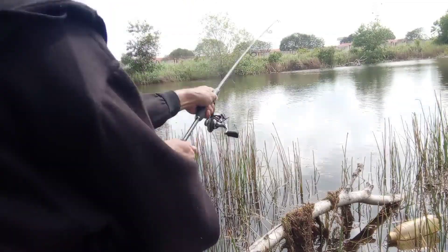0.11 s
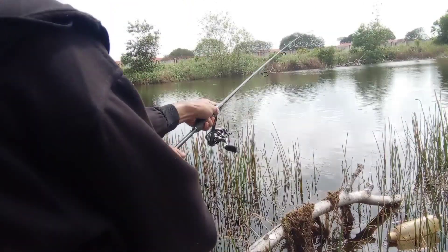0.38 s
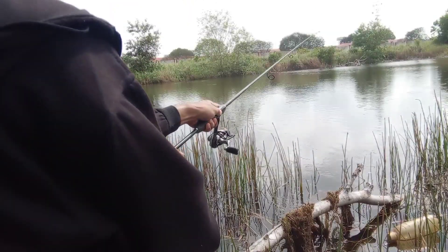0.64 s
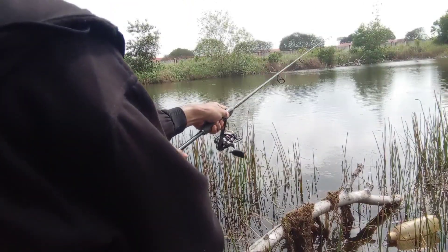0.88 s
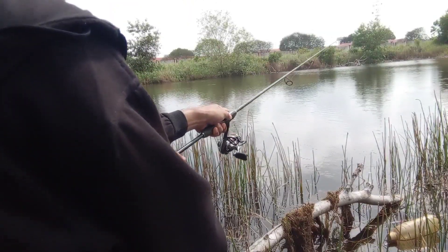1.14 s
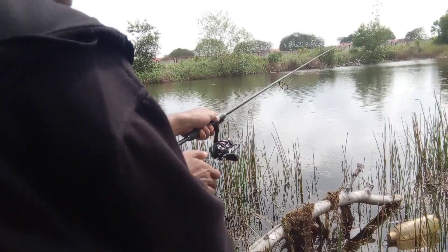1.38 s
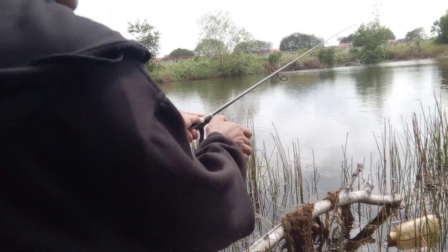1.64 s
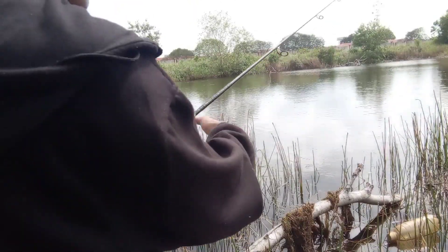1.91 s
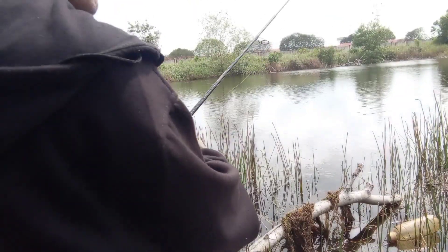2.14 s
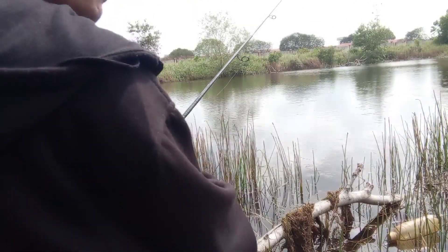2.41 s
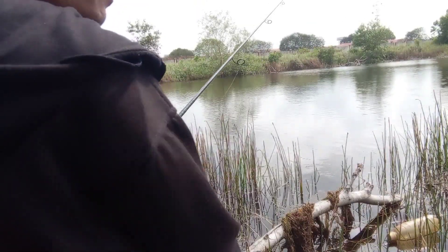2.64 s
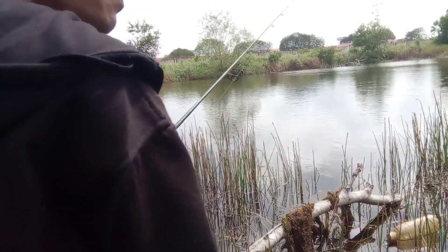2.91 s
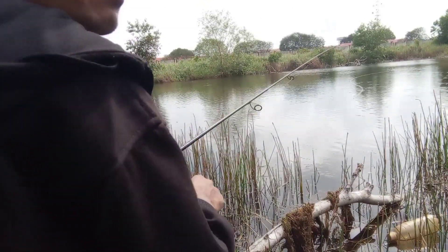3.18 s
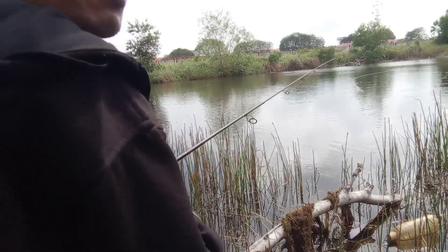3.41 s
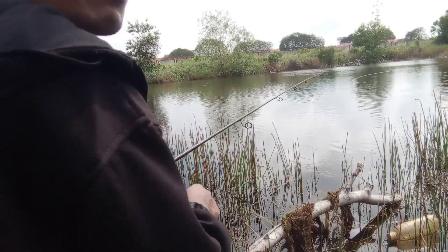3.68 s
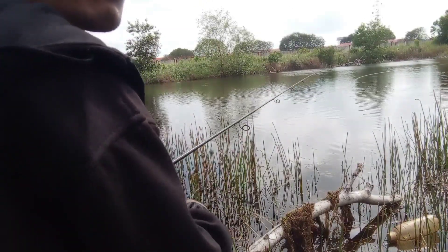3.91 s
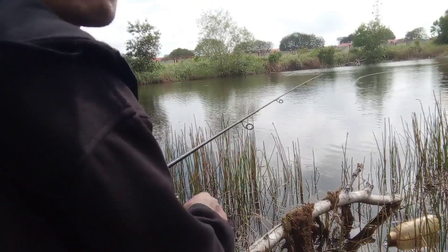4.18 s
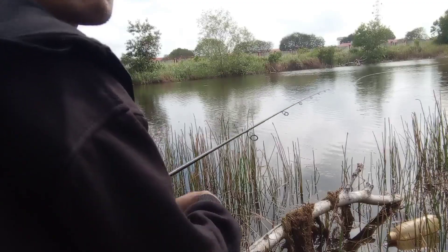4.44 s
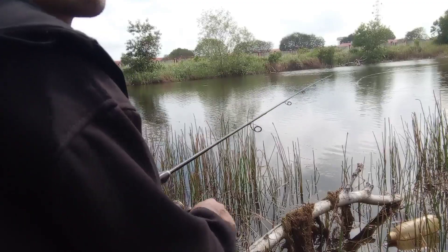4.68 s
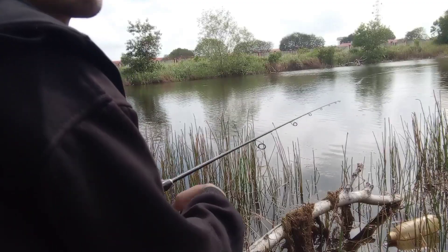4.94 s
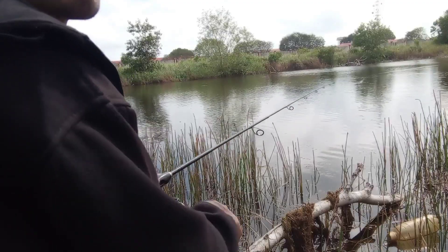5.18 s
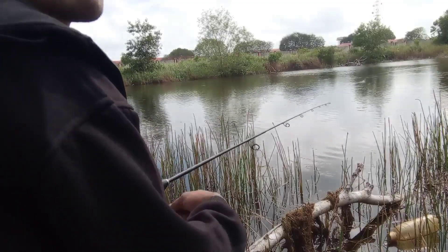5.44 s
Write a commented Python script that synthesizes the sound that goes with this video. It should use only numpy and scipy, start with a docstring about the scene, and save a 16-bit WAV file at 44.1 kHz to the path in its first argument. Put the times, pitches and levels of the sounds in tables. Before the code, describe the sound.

Quick cast with whoosh and sizzling line, followed by scattered sharp bird calls, small tackle clicks and a faint wavering reel whine outdoors.

```python
"""Casting over a reedy pond

An angler casts: noise bands form the rod's swish and the hiss of line off the spool; the rod tip whistles.
Noise cracks strike the reel's resonances as clicks, and a roughened sine is its whine.
A water bird in the reeds gives short rasping chucks: fluttered partials with noise in throat resonances.
Gliding sines are hollow notes and far small birds; a thin tone and a sleeve brush come over air and rumble.
"""
import sys
import numpy as np
from scipy import signal
from scipy.fft import rfft, irfft, next_fast_len
from scipy.io import wavfile
from scipy.ndimage import uniform_filter1d

SR = 44100
rng = np.random.default_rng(int(sys.argv[2]) if len(sys.argv) > 2 else 0)


def digitize_waveform(pressure):
    """Quantize a signal to 16-bit integers and store it at the path in sys.argv[1].

    Rows of a 2-D input are taken as channels; values are limited to [-1, 1].
    """
    field = np.atleast_2d(pressure).T
    bounded = np.clip(field, -1, 1)
    quanta = np.round(bounded * 32767).astype(np.int16)
    wavfile.write(sys.argv[1], SR, quanta)


def attenuation_scalar(level_db):
    """Turn a level in dB into a linear amplitude multiplier (20 dB per decade)."""
    decades = np.asarray(level_db, float) / 20
    return 10 ** decades


N = 245637
T = np.arange(N) / SR   # seconds

# Steady air noise: spectrum. Each row: frequency in Hz, relative density in dB per Hz.
AIR_SPECTRUM = [(100, 2), (308, -15), (550, -18.5), (1290, -24), (4840, -27), (6180, -25.5), (7600, -34.5),
                (9250, -38), (11700, -49.5), (13600, -44.5), (16000, -42.5)]
# Low outdoor rumble: course. Each row: time in seconds, level in dB.
RUMBLE_LEVEL = [(0, -66), (.55, -61), (.9, -67), (1.7, -63), (2.6, -65), (3.45, -61.5), (3.8, -65),
                (4.6, -66), (5.57, -65.5)]
# Rumble spectrum. Each row: frequency in Hz, relative density in dB per Hz.
RUMBLE_SPECTRUM = [(25, -20), (45, -17), (75, -6), (97, 0.5), (130, -3), (177, -5.5), (300, -18),
                   (390, -38.5)]
# Line running out: course. Each row: time in seconds, hiss level in dB.
LINE_LEVEL = [(.03, -66), (.04, -63), (.066, -51), (.102, -37.5), (.138, -38.5), (.186, -49), (.266, -49),
              (.434, -58), (.7, -67), (1.1, -79.5)]
# Line hiss spectrum. Each row: frequency in Hz, relative density in dB per Hz.
HISS_SPECTRUM = [(2240, -36.5), (3800, -26.5), (5810, 1), (7220, 2.5), (7830, -4.5), (9050, -1),
                 (10500, -21.5), (13600, -41.5), (22000, -120)]
# Top of the line hiss: spectrum. Each row: frequency in Hz, relative density in dB per Hz.
TOP_HISS_SPECTRUM = [(9500, -6.5), (11300, -12.5), (13400, -10.5), (16000, -7)]
# Singing of the line: times in seconds at which it comes in, is full, is still full, is gone.
SINGING_TIMES = (.07, .14, .74, .9)
# Swing of the rod: course. Each row: time in seconds, whoosh level in dB, air rush level in dB.
CAST_LEVELS = [(.032, -71, -63), (.066, -39, -48.5), (.102, -47, -30.5), (.138, -44, -34),
               (.186, -69, -51.5), (.224, -68, -49.5), (.266, -53.5, -45.5), (.33, -70, -53),
               (.44, -71, -64)]
# Rod whoosh spectrum. Each row: frequency in Hz, relative density in dB per Hz.
WHOOSH_SPECTRUM = [(130, -60), (220, -39), (298, -4.5), (350, -3.5), (646, -0.5), (1100, -11), (1430, -33),
                   (2420, -120)]
# Air rush spectrum. Each row: frequency in Hz, relative density in dB per Hz.
RUSH_SPECTRUM = [(530, -27), (900, -7), (1170, -5.5), (1380, -2), (1830, -4.5), (2360, -2.5), (4500, -4.5),
                 (5850, -10), (9900, -120)]
# Whistles of the speeding rod tip. Each row: start in seconds, length in seconds, first pitch in Hz,
# last pitch in Hz, greatest level in dB.
ROD_WHISTLES = [(.09, .05, 1398, 2080, -39), (.092, .04, 2750, 4340, -42)]
# Hollow swoops, knocks and hoots. Each row: start in seconds, length in seconds, first pitch in Hz,
# last pitch in Hz, greatest level in dB.
HOLLOW_NOTES = [(.048, 0.037, 419.6, 744, -46.5), (.451, 0.017, 1057, 1102, -44.5),
                (1.778, 0.028, 952, 1040, -58), (1.964, 0.0191, 760, 685, -43),
                (1.988, 0.03, 645, 506, -61), (2.675, 0.12, 785, 813, -57)]
# Clicks of reel and tackle. Each row: start in seconds, strength in dB, nominal pitch of the crack in Hz.
CLICKS = [(0.24, -35, 6070), (1.6348, -56, 6840), (1.909, -51.5, 6140), (1.9157, -50.5, 5960),
          (1.9654, -48, 3640), (1.977, -40, 5160), (2.0658, -53.5, 3950), (2.09, -60, 3700),
          (2.4718, -32, 5300), (2.692, -51.5, 2200), (3.3921, -60, 3300), (4.264, -52.5, 4000),
          (4.282, -54.5, 1990), (4.404, -60.5, 4788), (4.733, -50.5, 3510), (5.1524, -59, 6020),
          (5.1993, -49.5, 3670)]
# Resonances of the reel. Each row: frequency in Hz, relative strength in dB, time to fall 60 dB in seconds.
REEL_MODES = [(1260, -25, .015), (1890, -3, 0.02), (2320, -9, .012), (3450, -3, .012), (4250, 7.5, 0.015),
              (5260, 1.5, 0.018), (5950, -8, 0.014)]
# Short far chirps. Each row: start in seconds, length in seconds, first pitch in Hz, last pitch in Hz,
# greatest level in dB.
CHIRPS = [(.3, 0.046, 3720, 4400, -58), (.37, 0.036, 4600, 4550, -54.5), (1.745, 0.07, 5600, 5600, -67.5),
          (2.06, 0.047, 3870, 4020, -69), (2.52, 0.072, 3500, 3900, -80), (4.075, 0.049, 5600, 5600, -68),
          (4.45, 0.096, 3060, 2969, -73.5), (5.2, 0.0434, 3700, 3710, -70.5),
          (5.4, 0.093, 5900, 5620, -66.5), (5.52, 0.07, 3750, 3970, -70)]
# Far rising whistles. Each row: start in seconds, length in seconds, first pitch in Hz, last pitch in Hz,
# greatest level in dB.
WHISTLES = [(1.485, 0.12, 3350, 4840, -57), (2.615, 0.12, 3450, 4580, -58), (4.15, .12, 3400, 4760, -60)]
# Chucks of the water bird, each turning on a crest of pitch. Each row: crest time in seconds, lead-in in
# seconds, tail in seconds, crest pitch in Hz, dip pitch in Hz, closing pitch in Hz, level in dB, change over
# the tail in dB, half lines relative to the voice in dB, octave relative to the voice in dB.
CHUCKS = [(0.489, 0.033, 0.032, 1930, 1331, 1430, -28.5, -4.5, -3.5, -10.5),
          (.750, 0.027, 0.034, 1923, 1450, 1600, -27, -1, -6, -12.5),
          (1.172, 0.03, 0.03, 1969, 1409, 1600, -31, -3, -2, -7),
          (1.297, 0.03, 0.034, 1787, 1199, 1300, -31.5, -11.5, -7, -6.5),
          (1.581, 0.028, 0.04, 1826, 1225, 1350, -34, -8, -2.5, -12.5),
          (2.39, .026, 0.0415, 1670, 1064, 1320, -35.5, -3, -4, -5),
          (2.509, 0.0239, 0.041, 1605, 1075, 1300, -44, -8, 5, -6.5),
          (3.349, .029, .032, 1994, 1442, 1540, -32, -6.5, 0.5, -9.5),
          (4.559, 0.028, 0.027, 1925, 1450, 1500, -32.5, -4, 0, -10),
          (4.772, 0.031, 0.026, 1917, 1504, 1520, -34, -3.5, 0, -7),
          (5.494, .027, 0.035, 1689, 1214, 1330, -34, -4.5, -14, -6)]
# Throat resonances. Each row: centre in Hz, width in Hz, level relative to the voice in dB with the beak open.
THROAT_MODES = [(2880, 220, -25), (3630, 210, -35.5), (4260, 96, -41), (4680, 380, -44), (5380, 170, -41.5),
                (5820, 500, -31.5), (6800, 310, -34.5), (7290, 1100, -35.5), (9130, 400, -46)]
# How freely each pitch leaves throat and beak. Each row: frequency in Hz, gain in dB.
PASSAGE = [(1000, -21), (1250, -3.5), (1550, 1), (1790, -4), (2050, 2.5), (2500, -6.5), (2900, -8),
           (3300, -21), (3700, -15), (4300, -16.5), (5200, -15), (6500, -26)]
# Spells of the thin far tone, one list for each. Each row: time in seconds, level in dB.
FAR_TONE_SPELLS = [
    [(.5, -83.5), (1.8, -83)],
    [(2.85, -87.5), (3.3, -89)],
    [(3.42, -87), (4.0, -80)],
]
# Sleeve brush spectrum. Each row: frequency in Hz, relative density in dB per Hz.
CLOTH_SPECTRUM = [(900, -7), (2000, -7), (3500, -10.5), (5500, 0), (7500, -12), (9000, -27), (12000, -32),
                  (15500, -25.5)]
# Whine of the turning reel: course. Each row: time in seconds, pitch in Hz, level in dB.
WHINE_COURSE = [(3.15, 1890, -82), (3.3, 1775, -75), (3.47, 1822, -64), (3.57, 1950, -88),
                (3.68, 1715, -77), (3.74, 1740, -72), (3.88, 1802, -74.5), (4.0, 1965, -68.5),
                (4.1, 1760, -74.5), (4.18, 1722, -83), (4.3, 1955, -68.5), (4.39, 1910, -86),
                (4.46, 1884, -71.5), (4.56, 1837, -78), (4.9, 1875, -92), (4.97, 1850, -68),
                (5.14, 1784, -82), (5.22, 1757, -67.5), (5.3, 1774, -65), (5.335, 1808, -85),
                (5.39, 1860, -67.5), (5.47, 1910, -70)]


def rms_one(x):
    """Normalisation: a signal divided by its root mean square has rms 1."""
    return x / np.sqrt(np.mean(x ** 2) + 1e-20)


def in_time(rows):
    """Piecewise linear interpolation: each column as a curve, then a gate open from first row to last."""
    s, *columns = np.transpose(rows)
    curves = [np.interp(T, s, column) for column in columns]
    gate = np.interp(T, [s[0] - 0.004, s[0], s[-1], s[-1] + 0.005], [0, 1, 1, 0])
    return curves + [gate]


def joined(tables):
    """Superposition of gates: several short courses become one set of curves with a common gate."""
    all_rows = sum(map(list, tables), [])
    gate = np.minimum(sum(in_time(table)[-1] for table in tables), 1)
    return in_time(all_rows)[:-1] + [gate]


def drift(rate_hz):
    """Low-pass filtering: two equal poles turn white noise into slow wandering of rms 1."""
    r = np.exp(-2 * np.pi * rate_hz / SR)
    noise = rng.standard_normal(N + SR)
    return rms_one(signal.lfilter([1], [1, -2 * r, r * r], noise)[SR:])   # the first second settles the filter


def coloured(spectrum):
    """Spectral shaping: white noise weighted in frequency, its rms brought to 1."""
    hz, db = np.transpose(spectrum)
    size = next_fast_len(N)
    log_hz = np.log(np.arange(size // 2 + 1) * SR / size + 1)
    shape = attenuation_scalar(np.interp(log_hz, np.log(hz), db, left=-90, right=-90))
    return rms_one(irfft(rfft(rng.standard_normal(size)) * shape, size)[:N])


def ring(x, hz, t60):
    """Damped resonance: a unit impulse excites a decaying sine of initial height 1."""
    r, w = attenuation_scalar(-60 / (t60 * SR)), 2 * np.pi * hz / SR
    return signal.lfilter([0, np.sin(w)], [1, -2 * r * np.cos(w), r * r], x + 1e-18)


def tone(hz, rough, width_hz):
    """Quadrature modulation: random swelling of sine and cosine smears a gliding line; rms 1."""
    phase = 2 * np.pi * np.cumsum(hz) / SR
    in_phase = (1 - rough + rough * drift(width_hz)) * np.sin(phase)
    return rms_one(in_phase + rough * drift(width_hz) * np.cos(phase))


def notes(rows, rough, width_hz, rise, sag_db, bend):
    """Frequency glide: short soft-edged notes, fullest at the share `rise` of their length."""
    curves = []
    for s, length, first_hz, last_hz, db in rows:
        span_hz = last_hz - first_hz
        curves.append([(s, first_hz, db - 15.5),
                       (s + rise * length, first_hz + rise ** bend * span_hz, db),
                       (s + 0.75 * length, first_hz + 0.75 ** bend * span_hz, db - sag_db),
                       (s + length, last_hz, db - 15.5)])
    hz, db, gate = joined(curves)
    return gate * attenuation_scalar(db) * tone(hz, rough, width_hz)


def air_noise():
    """Broadband noise: an almost steady, high-passed air noise."""
    air = signal.sosfilt(signal.butter(2, 200, "high", fs=SR, output="sos"), coloured(AIR_SPECTRUM))
    return attenuation_scalar(-65.5 + 0.5 * drift(7.9)) * air


def rumble():
    """Amplitude modulation: low-frequency noise made lumpy by a wandering level."""
    rumble_db, _ = in_time(RUMBLE_LEVEL)
    return attenuation_scalar(rumble_db + 2.9 * drift(13.0)) * coloured(RUMBLE_SPECTRUM)


def running_line():
    """Friction noise: line whips through the rings in fine grains and sings; the free spool hisses on."""
    hiss_db, running = in_time(LINE_LEVEL)
    spool_db, spinning = in_time([(0.2, -66.5), (0.68, -67.5)])   # s, dB
    hiss = attenuation_scalar(hiss_db + 0.92 * drift(200) + 1.2 * drift(25)) * coloured(HISS_SPECTRUM)
    top_level = attenuation_scalar(hiss_db - 11.5) + spinning * attenuation_scalar(spool_db)
    top = top_level * attenuation_scalar(1.8 * drift(100)) * coloured(TOP_HISS_SPECTRUM)
    singing = attenuation_scalar(hiss_db - 6.5 + 5.0 * drift(9.4)) * tone(np.full(N, 5600), rough=0.44, width_hz=78)
    singing *= np.interp(T, SINGING_TIMES, [0, 1, 1, 0])
    return running * (hiss + top + singing)


def rod_swish():
    """Aerodynamic noise: air torn by the rod gives a whoosh and a rush; the speeding tip whistles."""
    whoosh_db, rush_db, gate = in_time(CAST_LEVELS)
    whoosh = attenuation_scalar(whoosh_db + 1.9 * drift(40)) * coloured(WHOOSH_SPECTRUM)
    rush = attenuation_scalar(rush_db + 1.5 * drift(160) + 0.85 * drift(520)) * coloured(RUSH_SPECTRUM)
    # one call per whistle, since the whistles overlap
    whistles = sum(notes([row], rough=0.3, width_hz=100, rise=0.36, sag_db=1.5, bend=0.9)
                   for row in ROD_WHISTLES)
    return whistles + gate * (whoosh + rush)


def hollow_notes():
    """Narrow-band tones: brief gliding notes, heard as hollow swoops, knocks and hoots."""
    return notes(HOLLOW_NOTES, rough=0.4, width_hz=47, rise=0.167, sag_db=4.5, bend=0.91)


def tackle():
    """Impact excitation: each click is a dying noise crack; the louder it is, the more the reel rings."""
    cracks, blows = np.zeros(N), np.zeros(N)
    t = np.arange(int(0.04 * SR)) / SR
    decay = attenuation_scalar(-60 * t / 0.034) * np.minimum(t / 0.0011, 1)   # falls 60 dB in 34 ms, soft onset
    noises = rng.standard_normal((len(CLICKS), len(t)))
    for (s, db, hz), noise in zip(CLICKS, noises):
        edges_hz = [hz * 0.88, min(hz * 1.033, 0.45 * SR)]
        crack = signal.sosfilt(signal.butter(1, edges_hz, "band", fs=SR, output="sos"), noise)
        i = round(s * SR)
        cracks[i:i + len(t)] += 0.69 * attenuation_scalar(db) * rms_one(crack) * decay
        blows[i] = attenuation_scalar(1.476 * db)   # ringing grows faster than the crack
    ringing = sum(attenuation_scalar(db) * ring(blows, hz, t60) for hz, db, t60 in REEL_MODES)
    return cracks + attenuation_scalar(7.5) * ringing


def echoes(x):
    """Diffuse scattering: reeds and bank return a short tail, modelled by convolution with dying noise."""
    t = np.arange(int(0.2 * SR)) / SR
    tail = rng.standard_normal(len(t)) * attenuation_scalar(-60 * t / 0.12) * (t > 0.008)   # 60 dB in 0.12 s
    return attenuation_scalar(-23) * signal.fftconvolve(x, tail / np.sqrt(np.sum(tail ** 2)))[:N]


def far_birds():
    """Random modulation: clean gliding whistles and chirps are blurred by distance."""
    whistles = notes(WHISTLES, rough=0.37, width_hz=93, rise=0.46, sag_db=8, bend=0.75)
    chirps = notes(CHIRPS, rough=0.52, width_hz=32, rise=0.34, sag_db=1.5, bend=1.1)
    return whistles + chirps


def chuck(s, lead, tail, crest_hz, dip_hz, closing_hz, db, fade_db, half_db, octave_db):
    """Period doubling: half lines open the call before the voice; pitch climbs, drops and half recovers."""
    start, end = s - lead, s + tail
    drop, release = 0.009, 0.008   # seconds: crest to dip, dying away
    silent_db, opening_db = -27.5, -22.5
    pitch = [(start, 0.71 * crest_hz), (start + 0.7 * lead, 0.84 * crest_hz),
             (s - 0.0027, crest_hz), (s + 0.00135, crest_hz),
             (s + drop, dip_hz), (s + drop + 0.006, dip_hz),
             (s + 0.75 * tail, closing_hz), (end, closing_hz)]
    effort = [(start - 0.0074, db + silent_db), (start, db), (s, db),
              (end - release / 2, db + fade_db), (end + release, db + fade_db + silent_db)]
    voice = [(start + (0.41 - 0.11) * lead, opening_db), (start + 0.41 * lead, 0),
             (end, 0), (end + release, opening_db)]
    half = [(start, half_db - 16.5), (start + 0.27 * lead, half_db),
            (start + 0.66 * lead, silent_db), (s, silent_db), (s + drop, -32.5)]
    hoarse = [(s - 0.0092, 0), (s, -13.5), (s + drop, 0)]   # rasp and octave thin out around the crest
    progress = [(start, 0, octave_db), (end, 1, octave_db)]
    return pitch, effort, voice, half, hoarse, progress


def partial(hz, db, rough, width_hz):
    """Source and filter: one line of the voice, weighted by the passage at its own pitch."""
    return attenuation_scalar(db + np.interp(hz, *np.transpose(PASSAGE))) * tone(hz, rough, width_hz)


def water_bird():
    """Source and filter: fluttered overtones and half lines, with breath rasping in throat resonances."""
    curves = map(joined, zip(*[chuck(*row) for row in CHUCKS]))
    (hz, _), (effort_db, gate), (voice_db, _), (half_db, _), (hoarse_db, _), (late, octave_db, _) = curves
    hz = uniform_filter1d(hz, size=90)

    beat = np.cumsum(203 * (1 + 0.31 * drift(30.01))) / SR % 1   # uneven, 203 Hz on average
    flutter = rms_one(uniform_filter1d(np.exp(-1.04 * beat), size=50))   # each beat opens fast and sags

    voice = partial(hz, voice_db, rough=0.035, width_hz=82)
    voice += partial(hz * 3, voice_db - 22, rough=0.44, width_hz=38)
    octave_level = attenuation_scalar(voice_db + octave_db + 0.59 * hoarse_db) + attenuation_scalar(half_db - 5)
    # fluttered here and again with the whole voice, so the octave flutters more deeply
    voice += flutter * octave_level * partial(hz * 2, 0, rough=0.2, width_hz=110)
    voice += partial(hz * 3 / 2, half_db, rough=0.43, width_hz=113)
    voice += partial(hz * 5 / 2, half_db - 5.5, rough=0.44, width_hz=120)

    breath, throat = rng.standard_normal(N), 0
    for centre_hz, width_hz, db in THROAT_MODES:
        t60 = np.log(1000) / (np.pi * width_hz)
        # the beak opens as the call goes on, letting the treble out
        closed_db = 19.0 * np.clip(centre_hz / 3500 - 1, 0, 1) * (1 - late) ** 2
        resonance = ring(ring(breath, centre_hz, t60), centre_hz, t60)   # rung twice: dark valleys
        throat = throat + attenuation_scalar(db + 4.0 * drift(25) - closed_db) * rms_one(resonance)

    rasp = coloured([(1150, -9), (2000, 21.5), (3200, -18.0), (4000, -28.5), (9000, -24), (15500, -36.5)])
    noise = (attenuation_scalar(voice_db) + attenuation_scalar(half_db)) * (attenuation_scalar(-14 + hoarse_db) * rasp + throat)
    call = gate * attenuation_scalar(effort_db) * (noise + flutter * voice)
    return signal.sosfilt(signal.butter(6, 1242, "high", fs=SR, output="sos"), call)   # windpipe, Hz


def far_tone():
    """Harmonic pair: a thin far tone and its octave come and go."""
    hz = 2990
    far_db, gate = joined(FAR_TONE_SPELLS)
    fundamental = tone(np.full(N, hz), rough=0.49, width_hz=23.5)
    octave = tone(np.full(N, 2 * hz), rough=0.91, width_hz=48)
    return gate * attenuation_scalar(far_db) * (fundamental + 0.5 * octave)


def sleeve_brush():
    """Friction noise: one brush of cloth swells and fades about a single peak."""
    peak, swell, fade = 2.695, 0.051, 0.1   # seconds
    away = np.clip(np.maximum((peak - T) / swell, (T - peak) / fade), 0, 10)
    return attenuation_scalar(-62 - 20 * away ** 2.6) * coloured(CLOTH_SPECTRUM)


def reel_whine():
    """Frequency modulation: the rough whine of gears follows a wavering pitch."""
    hz, db, gate = in_time(WHINE_COURSE)
    return gate * attenuation_scalar(db + 3.6 * drift(8)) * tone(hz, rough=0.49, width_hz=130)


def scene():
    """Linear superposition: the pressures of all sources add at one microphone."""
    near = tackle() + water_bird()
    cast = running_line() + rod_swish()
    background = air_noise() + rumble() + far_birds() + far_tone()
    return (near + echoes(near) + cast + hollow_notes() + background + sleeve_brush() + reel_whine())[None]


def roll_off(x):
    """The treble ends steeply here."""
    return signal.sosfilt(signal.butter(12, 16070, fs=SR, output="sos"), x)


def record(dry):
    """Cavity resonance: the microphone port rings in the top octave, and a steep low-pass cuts the top."""
    port_hz, width_hz = 15300, 1600
    port_band = signal.butter(2, [port_hz - width_hz / 2, port_hz + width_hz / 2], "band", fs=SR, output="sos")
    port = signal.sosfilt(port_band, dry)
    top_cut = signal.cheby2(12, 60, 16200, fs=SR, output="sos")
    mix = signal.sosfilt(top_cut, dry + attenuation_scalar(9.5) * port)
    return roll_off(mix)


dry = scene()
out = record(dry)
digitize_waveform(out)
```